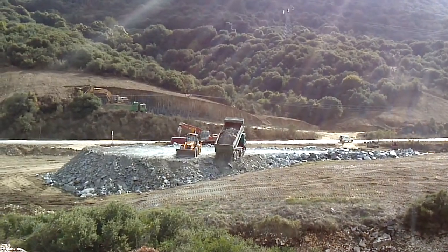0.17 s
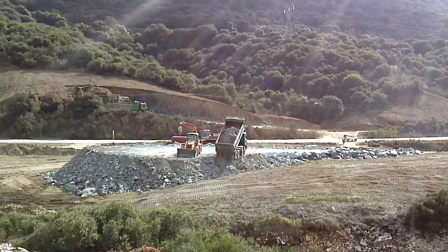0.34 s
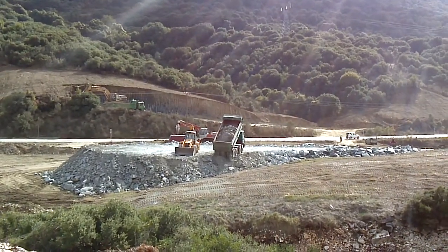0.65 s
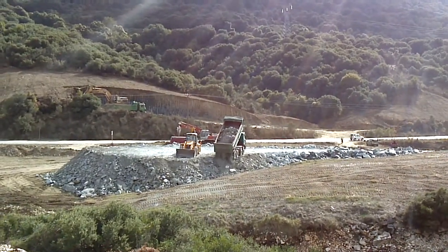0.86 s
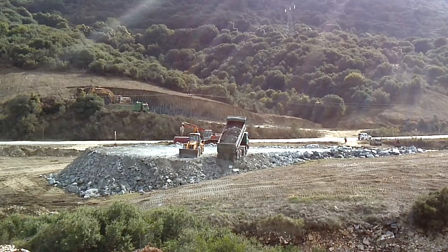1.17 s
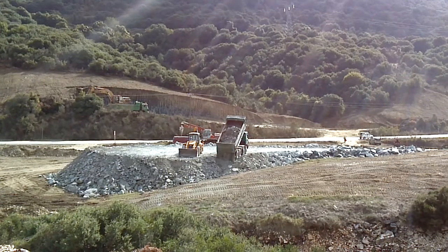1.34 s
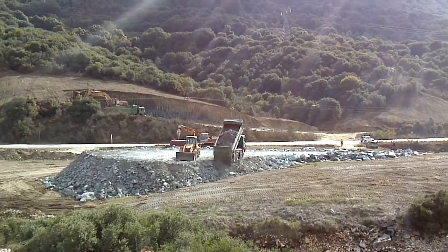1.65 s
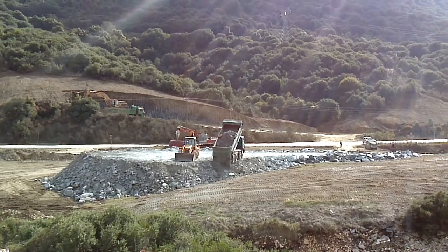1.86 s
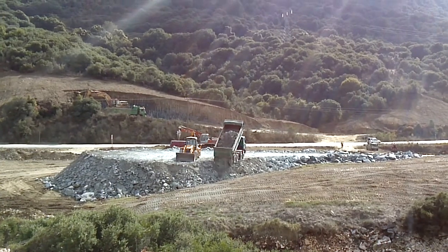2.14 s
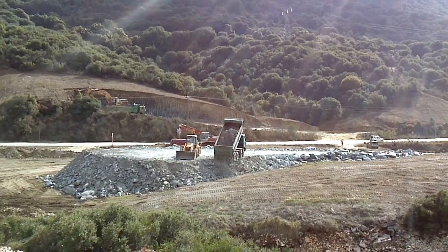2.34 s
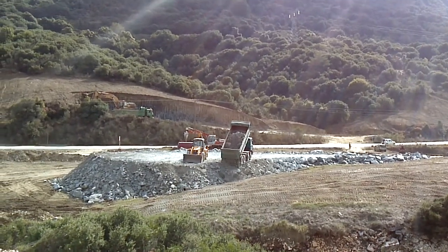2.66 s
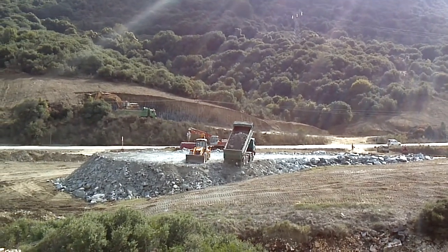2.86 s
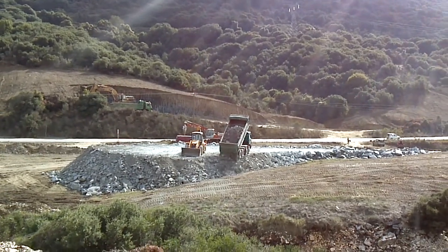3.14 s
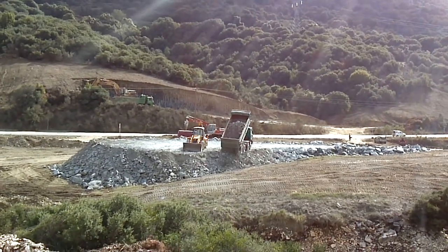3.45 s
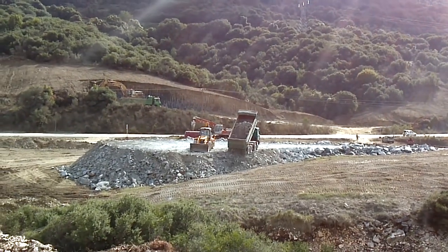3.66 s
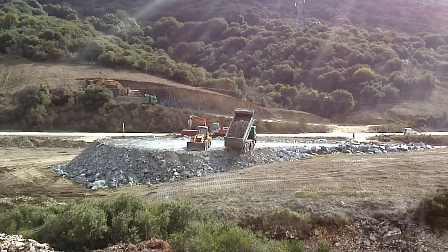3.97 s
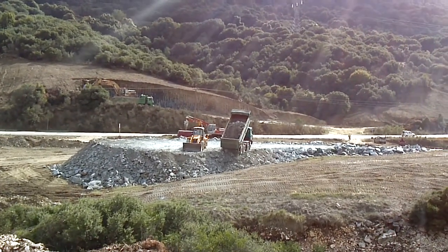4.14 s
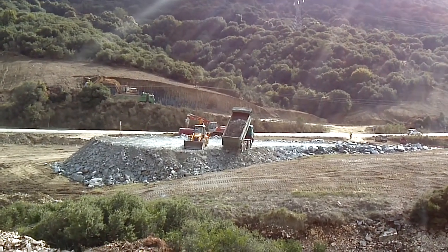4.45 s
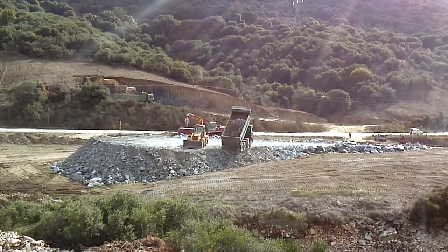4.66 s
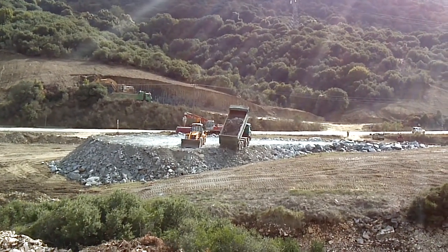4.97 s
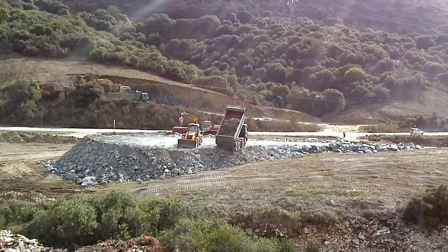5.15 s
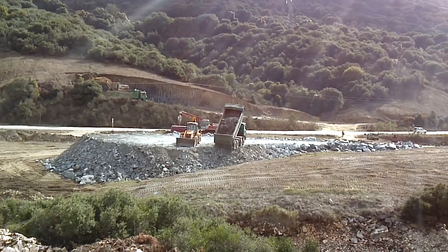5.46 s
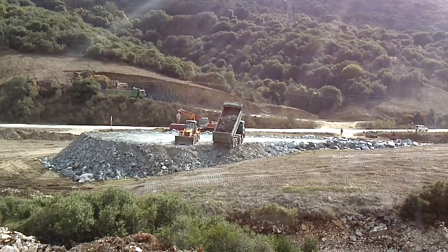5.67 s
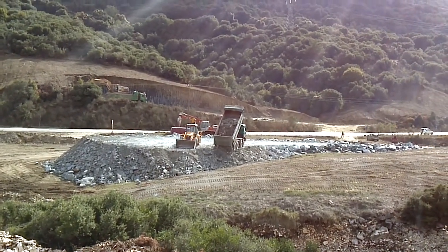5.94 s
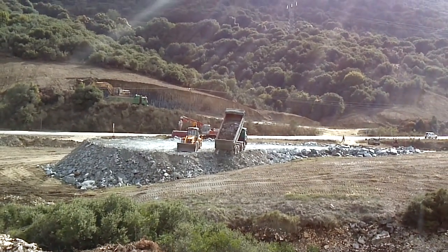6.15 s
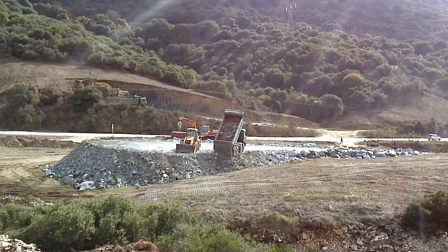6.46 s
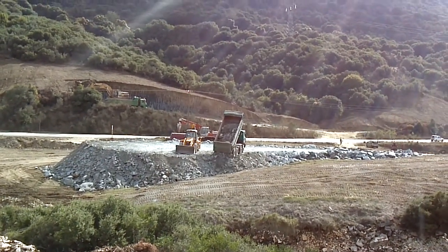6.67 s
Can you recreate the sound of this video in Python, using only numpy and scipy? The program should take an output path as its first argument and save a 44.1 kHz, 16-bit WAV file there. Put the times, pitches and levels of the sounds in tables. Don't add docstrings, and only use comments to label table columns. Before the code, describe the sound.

Distant diesel engines throb while a tipping truck's load of rock bangs on its steel bed, thuds onto the heap and rattles down.

```python
import sys
import numpy as np
from scipy import signal
from scipy.fft import rfft, irfft, next_fast_len
from scipy.io import wavfile
from scipy.ndimage import uniform_filter1d, map_coordinates

SR = 44100
rng = np.random.default_rng(int(sys.argv[2]) if len(sys.argv) > 2 else 0)


def magnitude_from_level(level_db):
    exponent = np.asarray(level_db, float) / 20
    return 10 ** exponent


def unload_wav(signal):
    wavfile.write(
        sys.argv[1],
        SR,
        np.round(np.clip(np.atleast_2d(signal).T, -1, 1) * 32767).astype(np.int16),
    )


N = 300321

# time in s, engine load in dB, rock flow in dB, weight of rolling rock in dB.
WORK_CURVES = [(0.0, -24.5, -39, 5.5), (0.2, -27, -39.5, 3.5), (0.55, -29.5, -34.5, -7),
               (1.0, -28, -38, -0.5), (1.45, -23, -36.5, -0.5), (1.72, -25.5, -36, -3),
               (2.05, -29, -38, -0.2), (2.4, -20.5, -35.5, 3), (2.54, -23, -34.5, .3),
               (2.69, -18.5, -28.5, -1.8), (3.0, -26.5, -37, -1), (3.41, -29, -30, -1),
               (3.75, -28, -37.5, 4.5), (4.3, -28, -38.5, 4), (4.9, -30, -32, -6.5), (5.5, -25, -34, -0.2),
               (6.05, -28, -33, 2), (6.81, -25.5, -30.5, 2.5)]
# start in s, length in s, pitch in Hz, level in dB, glide in Hz per s.
PUMP_HUMS = [
    (0.0, 0.98, 215, -32, 6.5),
    (1.016, .22, 219, -38.5, 1),
    (1.25, 0.41, 219, -31.5, 9),
    (3.2, 0.31, 239, -33, 12.5),
    (3.45, 0.14, 248, -26, -29),
    (4.89, 0.11, 238, -27.5, -93),
    (5.98, 0.21, 227.5, -26, -50),
]
# frequency in Hz, level in dB.
ENGINE_SPECTRUM = [(7.1, -37.5), (12, 7.5), (37, 10), (120, -1.5), (160, -28.5), (260, -120)]
# frequency in Hz, level in dB.
BOOM_SPECTRUM = [(35, -29.5), (60, -5.5), (102, 3.5), (157, -6.5), (182, -1), (296, -12.5), (400, -18),
                 (520, -49.5), (880, -120)]
# frequency in Hz, level in dB.
RATTLE_SPECTRUM = [(160, -13.5), (280, -5), (440, -1), (475, -3.5), (596, -5), (730, -4.5), (836, -14),
                   (965, -9.5), (1430, -18), (1550, -17.5), (1700, -33.5), (2210, -46.5), (3740, -120)]
# frequency in Hz, level in dB.
GRIT_SPECTRUM = [(760, -33.5), (1300, 2.5), (1420, -11), (1550, 0), (1830, -1.5), (1950, 1), (2300, 4),
                 (2740, -3), (2940, -4.5), (3220, -10), (3870, -8.5), (4280, -9.5), (4690, -15.5),
                 (6100, -34), (10300, -120)]
# frequency in Hz, width in Hz, level in dB.
GROUND_MODES = [(42.7, 55, -1.5), (91, 47.5, 3), (177.5, 29.6, 3.5), (251, 39.6, 2), (358.4, 29, -6.5)]
# frequency in Hz, width in Hz, level in dB.
BED_MODES = [(390, 60, -5), (450, 28, 2), (492, 30, 0), (560, 70, -5), (620, 35, 1), (723, 30, 1),
             (830, 110, -8), (940, 45, -3), (1040, 50, -4), (1180, 200, -9)]
# frequency in Hz, width in Hz, level in dB.
STONE_MODES = [(1562, 540, 1), (2100, 317, 3), (2216, 162, 8.5), (2710, 1050, -4.5), (3770, 570, -6.5),
               (3993, 87, -8)]
# frequency in Hz, width in Hz, level in dB.
CHIP_MODES = [(3390, 370, -2.8), (3735, 1000, -0.11), (4070, 500, -0.2)]
# frequency in Hz, time to fall 60 dB in s.
HILL_DECAY = [(100, 0.57), (1000, 0.13), (5000, 0.11)]
# frequency in Hz, level in dB.
OVERALL_RESPONSE = [(20, 0), (4400, 0), (4900, -3), (5300, -3), (5420, -70), (16000, -80)]
# start in s, peak in dB, top frequency in Hz, length in s.
TREBLE_FLICKERS = [(0.176, -56.5, 15300, 0.044), (1.991, -57, 15300, 0.038), (4.422, -56, 15300, 0.073),
                   (5.338, -52.5, 15300, 0.028), (2.3344, -58.5, 11600, .013), (4.772, -55, 12000, 0.014),
                   (5.821, -56.5, 12100, 0.037), (1.632, -55, 7470, 0.061), (3.5528, -52.5, 7550, 0.059),
                   (5.114, -51, 7380, .039), (6.264, -54, 6900, 0.036), (6.5284, -45.5, 7530, 0.044),
                   (6.574, -46.5, 7480, 0.022), (6.804, -46, 15300, 0.015)]
# start in s, top frequency in Hz.
TREBLE_TICKS = [(0.218, 6300), (0.355, 6300), (0.385, 6300), (0.582, 6300), (0.63, 6900), (0.681, 6900),
                (0.73, 6240), (1.019, 6240), (1.748, 6300), (1.787, 6300), (2.957, 6960), (3.036, 6150),
                (3.09, 6300), (3.137, 6850), (3.857, 6160), (4.086, 6900), (4.12, 6300), (4.492, 6300),
                (4.998, 6330), (5.293, 6300), (6.72, 6300)]
# start in s, bed in dB, rattling on in s, thud in dB over bed, ring in Hz.
BED_CLUMPS = [(0.376, -24, 0.013, 0.5, 740), (0.586, -25, 0.0064, -4.5, 716), (1.585, -31, .08, -1, 625),
              (1.689, -24, 0.07, -1.5, 592), (2.075, -33, .02, -1.5, 640), (2.34, -26.5, 0.036, 2, 627),
              (2.424, -22.5, 0.052, -2.5, 501), (2.672, -24.5, .04, 5, 536),
              (2.719, -18.5, 0.018, 0.5, 530), (3.122, -37, 0.025, 12.5, 394), (3.2, -35.5, 0.063, 7, 406),
              (3.376, -23, 0.039, 2.5, 986), (3.488, -26.5, 0.023, 3.5, 497),
              (3.575, -23.5, 0.0027, -13, 550), (3.918, -39, 0.039, 17, 435),
              (4.78, -17.5, 0.0088, -3, 1013), (4.854, -21.5, 0.026, -9, 814),
              (5.128, -19, 0.023, -10.5, 583), (5.344, -26, .012, -1.5, 542), (5.607, -18.5, 0.018, 4, 500),
              (5.883, -22, 0.023, 0, 512), (6.145, -33, .012, 5.5, 537), (6.431, -24.5, 0.033, 0, 518),
              (6.585, -18, 0.024, 4, 650)]
# start in s, thud in dB, bed in dB relative to thud.
HEAP_THUDS = [(0.187, -37.5, -4.5), (0.247, -28.5, -7), (0.504, -26.5, -8), (0.81, -33, -29.5),
              (1.161, -32.5, -17), (1.384, -24, -12), (1.446, -35.5, -16), (1.749, -22.5, -11),
              (1.921, -25.5, -20), (2.458, -13, -15.5), (2.849, -28, -4), (2.944, -26.5, -15),
              (3.084, -36, -2), (3.25, -18, -23.5), (3.334, -27, -11.5), (3.621, -25.5, -11.5),
              (3.718, -25.5, -15.5), (3.793, -27.5, -25.5), (3.986, -19, -18), (4.02, -26, -21),
              (4.053, -24, -18.5), (4.242, -28, -17.5), (4.3, -26.5, -6), (5.003, -23, -3),
              (5.307, -27.5, -9), (6.215, -20.5, -7), (6.383, -16, -9), (6.737, -25.5, -15.5)]
# start in s, crack in dB, bed in dB over crack.
STONE_CRACKS = [(0.339, -40.5, 7), (0.502, -44.5, -10), (0.658, -46, 11.5), (0.722, -38.5, -8.5),
                (1.002, -43, 4.5), (2.487, -37, 5), (2.691, -32, 8.5), (3.294, -38, -2.5),
                (3.488, -32.5, 1.5), (4.146, -35.5, -1), (4.546, -45.5, 6.5), (4.74, -41, 8.5),
                (5.128, -32, -0.6), (5.995, -40, 4), (6.144, -35, -0.8), (6.275, -37.5, 8),
                (6.545, -33, -18.5), (6.608, -30, 4)]
# start in s, bed in dB, ring in Hz, ring in dB over the usual.
PANEL_KNOCKS = [(0.4, -26, 1260, -2), (0.59, -33.5, 1210, 7), (0.612, -35, 460, -1.3),
                (1.63, -35.5, 632, 5), (2.34, -33, 623, 8.5), (2.375, -29, 512, 0),
                (2.516, -32.5, 442, -2.5), (2.744, -23.5, 417, 3.5), (2.9, -37.5, 408, 2.5),
                (3.105, -40.5, 406, 12), (3.125, -35.5, 478, 11.5), (3.158, -38, 442, 13),
                (3.395, -30, 1040, -4), (3.43, -36, 460, 1.5), (3.577, -26.5, 1000, -3),
                (3.95, -35, 1124, 3), (4.877, -15.5, 677, 0.5), (4.938, -32, 734, 3.5),
                (5.128, -33, 1580, 2), (5.168, -28.5, 473, 1.5), (5.886, -32, 500, 11.5),
                (5.916, -27.5, 905, 0.8), (5.93, -33, 470, 8), (6.069, -38, 440, 1),
                (6.476, -32, 684, -0.4), (6.608, -19, 607, -3.7), (6.61, -33.5, 2320, 13.5),
                (6.667, -35, 423, 2.5)]


def unit(x):
    return x / np.sqrt(np.mean(x ** 2) + 1e-20)


def along(points, hz):
    f, v = np.transpose(points)
    return np.interp(np.log(hz + 1), np.log(f + 1), v)


def curves(rows):
    s, *columns = np.transpose(rows)
    return [np.interp(np.arange(N) / SR, s, column) for column in columns]


def wobble(rate):
    rate = min(rate, 40)
    knots = rng.standard_normal(int(N * 40 / SR) + 4)
    return map_coordinates(knots, [np.arange(N) * rate / SR])


def filtered(x, response):
    m = next_fast_len(N + SR // 2)
    return irfft(rfft(x, m) * response(np.fft.rfftfreq(m, 1 / SR)), m)[..., :N]


def resonant(modes):
    def ring(f):
        total = 0
        for k, (centre, width, db) in enumerate(modes):
            damping = 1j * f * width
            total = total + (-1) ** k * magnitude_from_level(db) * damping / (centre * centre - f * f + damping)
        return total

    return lambda f: ring(f) / np.sqrt(np.mean(np.abs(ring(f)) ** 2))


def rush(spectrum, patchy_db, grain_db):
    z = signal.stft(rng.standard_normal(N + 512), nperseg=512)[2]
    field = uniform_filter1d(rng.standard_normal(z.shape), size=4, axis=0)
    field = uniform_filter1d(field, size=8, axis=1)
    noise = signal.istft(z * magnitude_from_level(patchy_db * unit(field)), nperseg=512)[1][:N]
    lumpy = noise * magnitude_from_level(grain_db * wobble(35))
    return unit(filtered(lumpy, lambda hz: magnitude_from_level(along(spectrum, hz))))


def engines():
    load_db, _, _ = curves(WORK_CURVES)
    phase = 2 * np.pi * np.cumsum(32 + 0.8 * wobble(7.3)) / SR
    firing = magnitude_from_level(-1 + 5.4 * wobble(5)) * np.sin(phase)
    return magnitude_from_level(load_db) * (rush(ENGINE_SPECTRUM, patchy_db=-0.56, grain_db=-2.5) + firing)


def pump():
    hum, t = np.zeros(N), np.arange(N) / SR
    ramp_s = 0.055
    unsteady_db, drift_hz = 3.2 * wobble(6), 1.3 * wobble(8.1)
    for s, length, hz, db, glide in PUMP_HUMS:
        gate = np.clip(np.minimum(t - s + ramp_s, s + length - t) / ramp_s, 0, 1)
        phase = 2 * np.pi * np.cumsum(hz + glide * (t - s) + drift_hz) / SR
        hum += gate * magnitude_from_level(db + 2.5 + unsteady_db) * np.sin(phase)
    return hum


def sliding_rock():
    _, flow_db, weight_db = curves(WORK_CURVES)
    more_db = flow_db + 35
    boom = magnitude_from_level(-29 + 0.69 * more_db + weight_db) * rush(BOOM_SPECTRUM, patchy_db=3.0, grain_db=-1.4)
    rattle = magnitude_from_level(flow_db + 1.5) * rush(RATTLE_SPECTRUM, patchy_db=1.9, grain_db=1.1)
    hiss = magnitude_from_level(-43.5 + 0.42 * more_db) * rush(GRIT_SPECTRUM, patchy_db=1.1, grain_db=1.33)
    return boom + rattle + hiss


def treble_flickers():
    t, out = np.arange(SR // 10) / SR, np.zeros(N + SR)
    hz = np.fft.rfftfreq(len(t), 1 / SR)
    tick_db, tick_s = -58.5, 0.036
    ticks = [(s, tick_db, top_hz, tick_s) for s, top_hz in TREBLE_TICKS]
    for s, db, top_hz, length in list(TREBLE_FLICKERS) + ticks:
        band = (hz > 5300) * (hz < top_hz)
        thin = unit(irfft(rfft(rng.standard_normal(len(t))) * band, len(t)))
        swell = np.sin(np.pi * np.clip(t / length, 0, 1))
        i = round(s * SR)
        out[i:i + len(t)] += magnitude_from_level(db - 6) * swell * thin
    return out[:N]


def hill(x):
    hz, t, z = signal.stft(rng.standard_normal(SR // 2), SR, nperseg=256)
    decay = magnitude_from_level(-60 * t / along(HILL_DECAY, hz)[:, None])
    tail = signal.istft(z * decay, SR, nperseg=256)[1]
    late = np.pad(x, (1500, 0))
    return signal.fftconvolve(late, tail / np.linalg.norm(tail))[:N]


def clump_blows():
    bounce_s, settle_db_per_s, settled_hz = 0.026, 380.5, 500
    rows = []
    for s, db, rattling, thud_db, hz in BED_CLUMPS:
        pace_luck, ring_luck = rng.standard_normal((2, 4))
        for k in range(4):
            after = k * bounce_s * np.exp(0.15 * pace_luck[k] / (k + 1))
            bed_db = db - settle_db_per_s * max(after - rattling, 0)
            crack_db = -14 - 2.5 * k - 0.28 * thud_db
            ring_hz = hz * (settled_hz / hz) ** min(0.4 * k, 1)
            ring_hz *= np.exp(0.12 * ring_luck[k] * (k > 0))
            rows.append((s + after, bed_db, thud_db, crack_db, -2 * k, ring_hz, 0.031))
    return rows


def blows():
    rows = []
    for s, db, under_db in HEAP_THUDS:
        rows.append((s, db + under_db, -under_db, -26.5 - under_db, 0, 470, 0.043))
    for s, db, over_db in STONE_CRACKS:
        rows.append((s, db + over_db, 2 - over_db, -over_db, 0, 650, 0.033))
    rows += clump_blows()
    for s, db, hz, ring_db in PANEL_KNOCKS:
        rows.append((s, db, -6, -15.5, ring_db, hz, 0.028))
    return rows


def boulders():
    shake, panel, chips = np.zeros((3, N + SR)), np.zeros(N + SR), np.zeros(N + SR)
    t = np.arange(SR // 9) / SR
    for s, db, thud_db, crack_db, ring_db, hz, length in blows():
        noise = rng.standard_normal((3, len(t)))
        luck, size = rng.random(len(t)), rng.random(len(t))
        hits = (luck < 0.012) * magnitude_from_level(12.8 * size) * np.sign(noise)
        knocks = 1.17 * noise + np.array([[6.0], [6.0], [3.5]]) * hits
        lasting = max(length, 0.008) * np.array([[0.85], [0.95], [0.8]])
        tumble = np.exp(-(t / lasting) ** 3.2) * (1 - np.exp(-t / 0.0004))
        first_blow = np.array([[14.0], [7.5], [4.5]]) * np.exp(-t / 0.00016)
        force = knocks * tumble + first_blow
        span = slice(round(s * SR), round(s * SR) + len(t))
        shake[:, span] += magnitude_from_level([[db + thud_db - 10.5], [db - 11], [db + crack_db - 3.0]]) * force
        peak = signal.iirpeak(hz, hz / 85, SR)
        panel[span] += magnitude_from_level(db + ring_db + 10.5) * signal.lfilter(*peak, force[1])
        splinter_db = 0.5 * (min(crack_db, -6) + 18.0)
        chips[span] += magnitude_from_level(db + crack_db - 12.5 + splinter_db) * knocks[2] * np.exp(-t / 0.012)
    out = panel[:N] + filtered(chips[:N], resonant(CHIP_MODES))
    for x, modes in zip(shake, (GROUND_MODES, BED_MODES, STONE_MODES)):
        out += filtered(x[:N], resonant(modes))
    return out


def scene():
    rock = boulders()
    return (rock + magnitude_from_level(-12.0) * hill(rock) + engines() + sliding_rock() + pump())[None]


def roll_off(x):
    return signal.sosfilt(signal.butter(12, 15700, fs=SR, output="sos"), x)


def record(dry):
    x = filtered(0.9 * np.tanh(dry / 0.9), lambda hz: magnitude_from_level(along(OVERALL_RESPONSE, hz)))
    for edge_hz, rarity in ((4350, -0.83), (4720, -1.1), (5000, 0.37)):
        shut = uniform_filter1d((wobble(33) < rarity) * 1.0, size=300)
        x = x - shut * filtered(x, lambda hz: hz > edge_hz)
    return roll_off(x + treble_flickers())


dry = scene()
out = record(dry)
unload_wav(out)
```